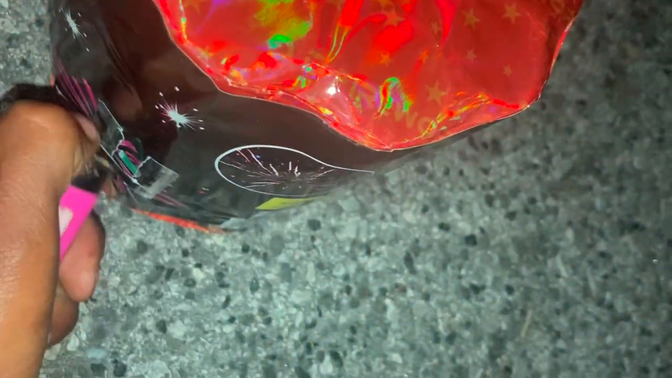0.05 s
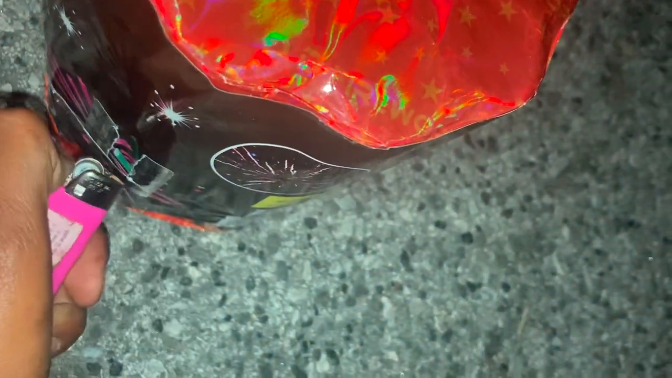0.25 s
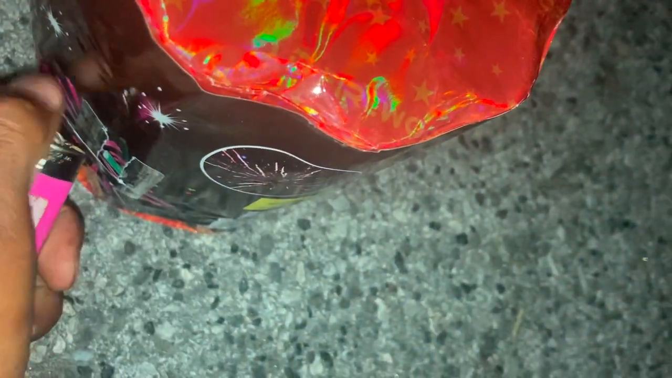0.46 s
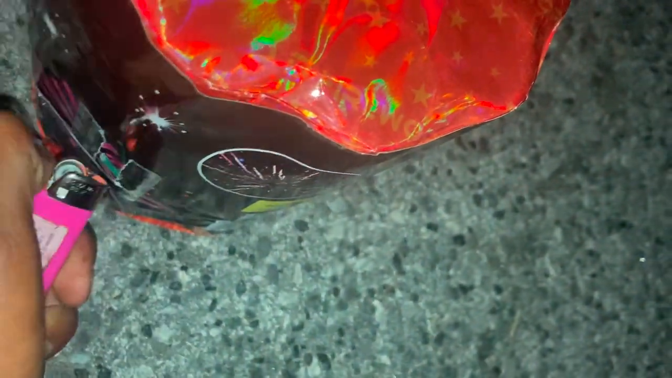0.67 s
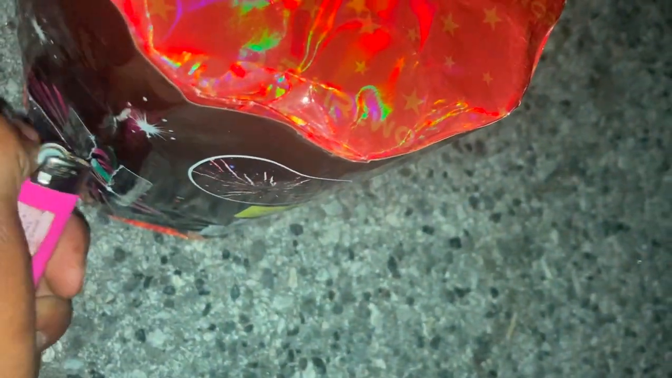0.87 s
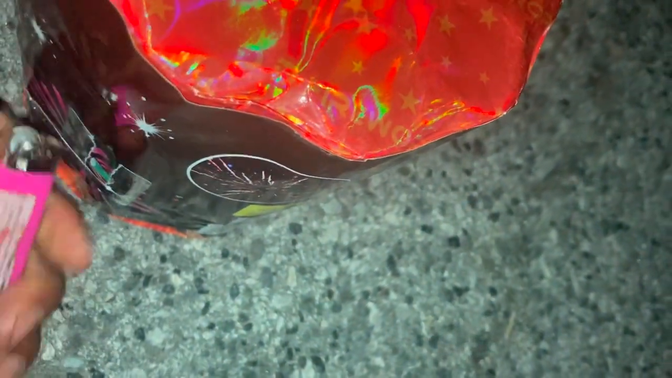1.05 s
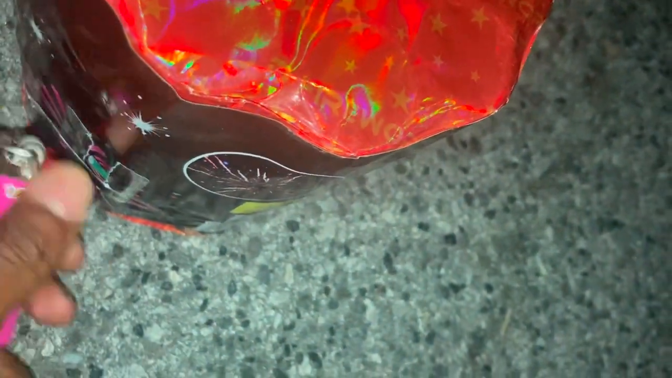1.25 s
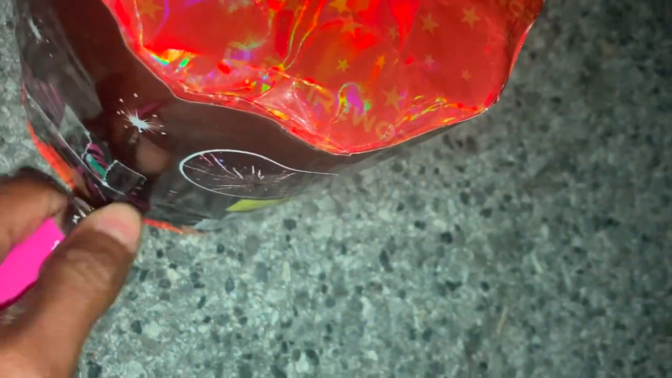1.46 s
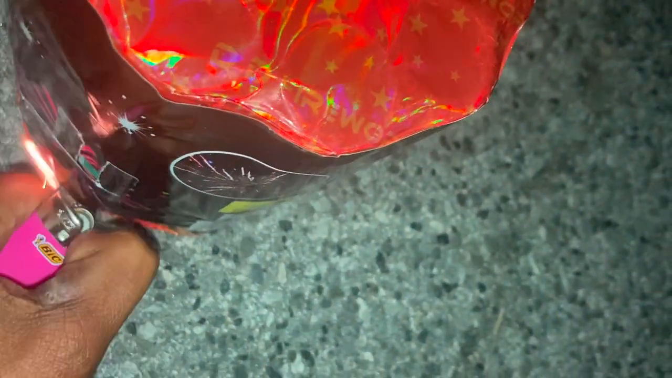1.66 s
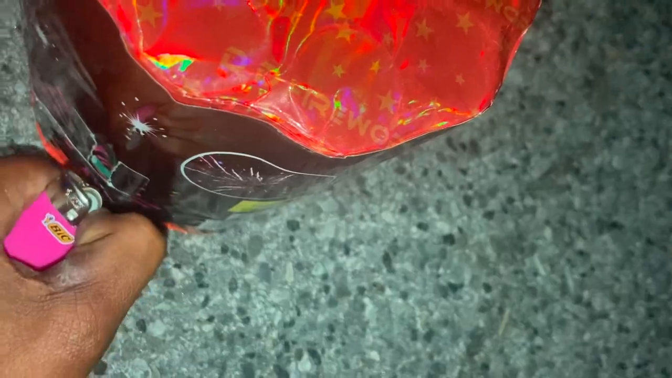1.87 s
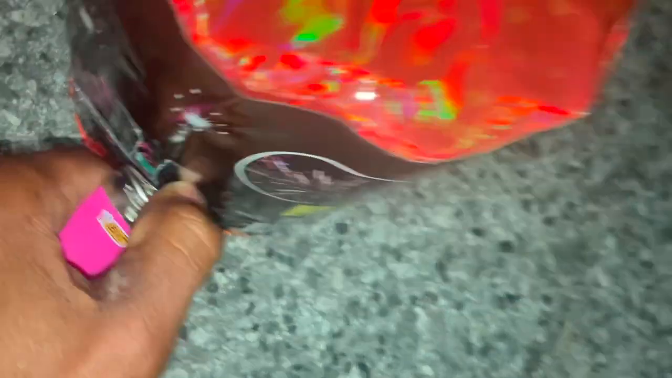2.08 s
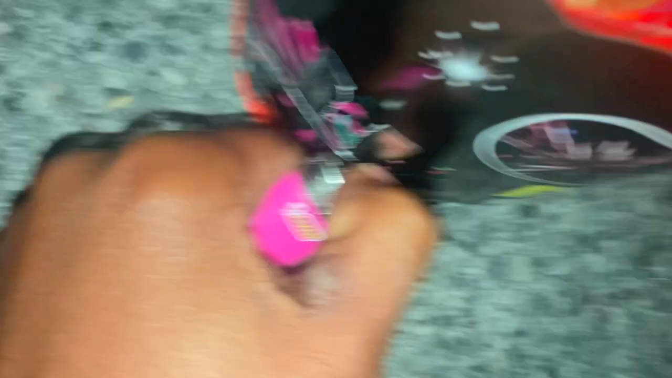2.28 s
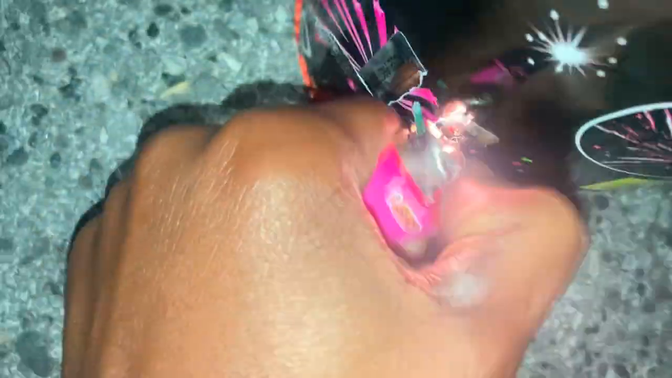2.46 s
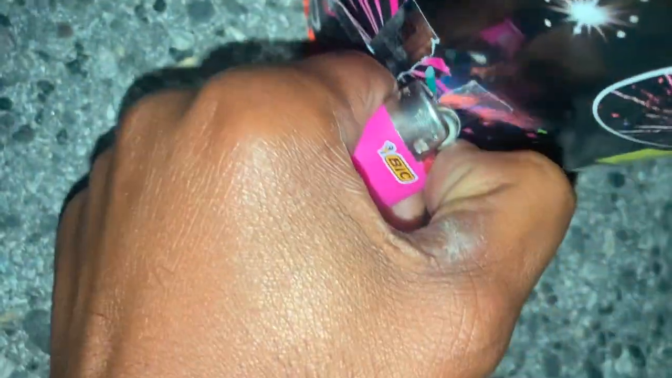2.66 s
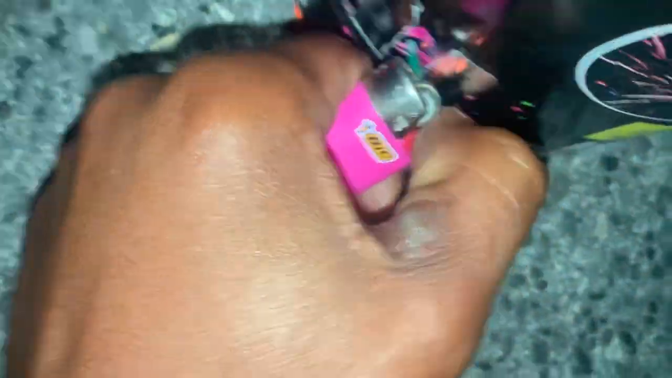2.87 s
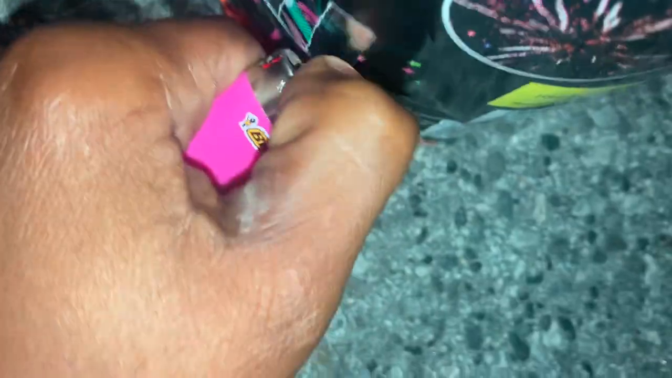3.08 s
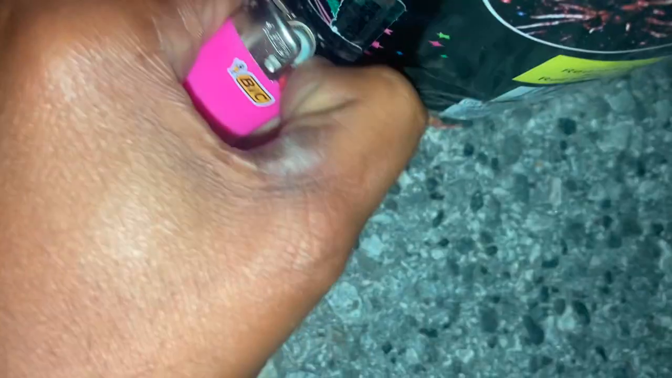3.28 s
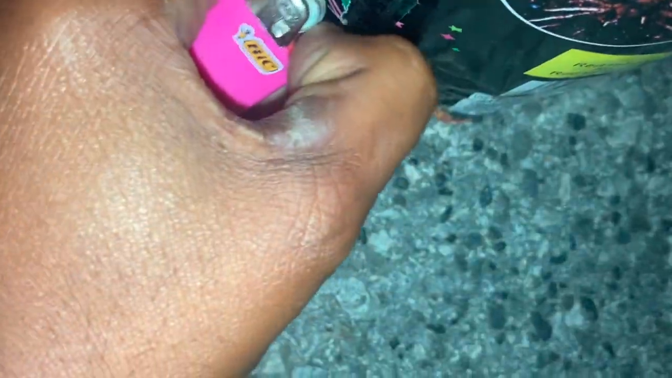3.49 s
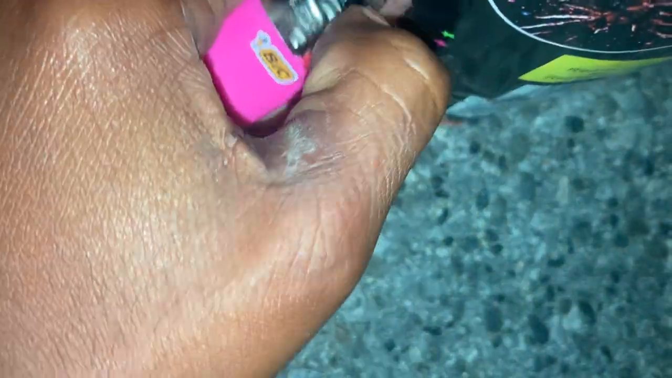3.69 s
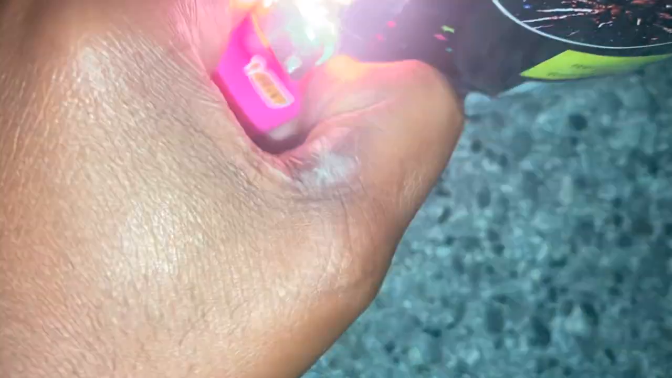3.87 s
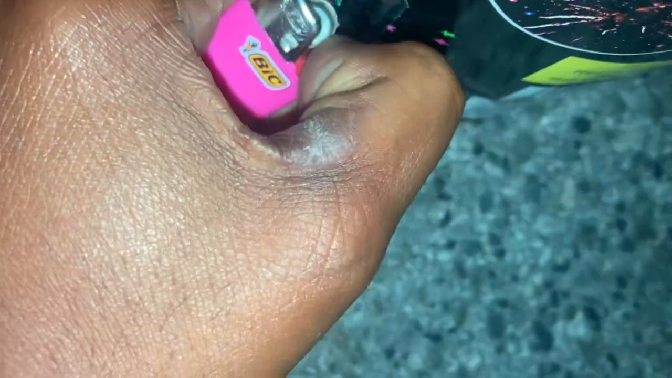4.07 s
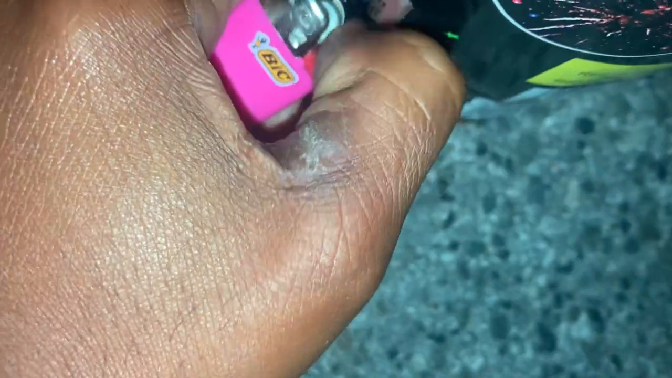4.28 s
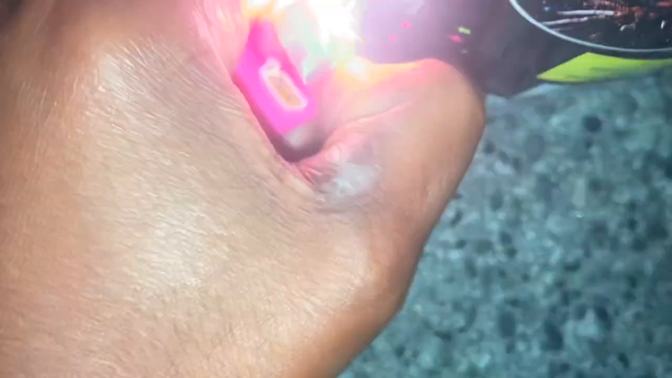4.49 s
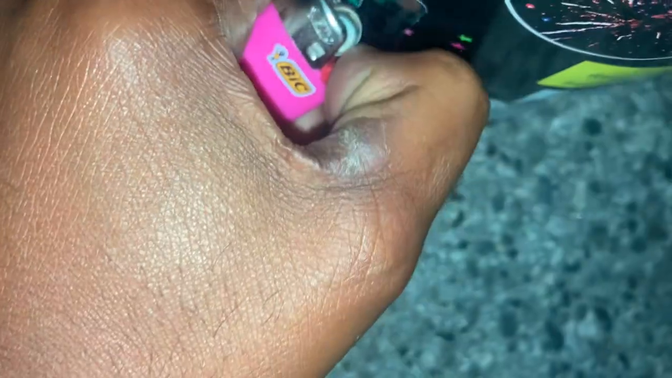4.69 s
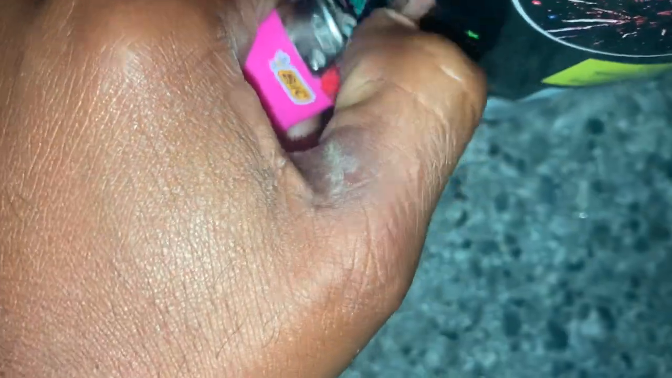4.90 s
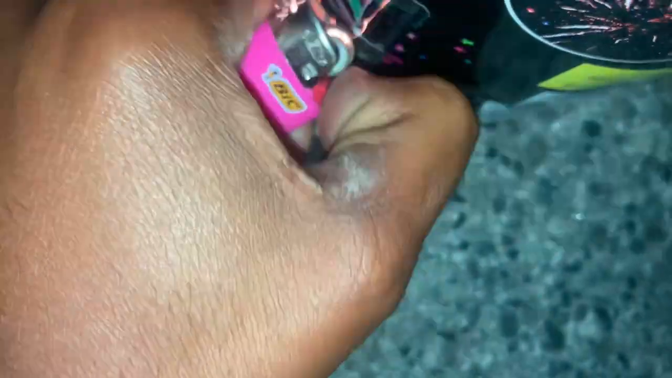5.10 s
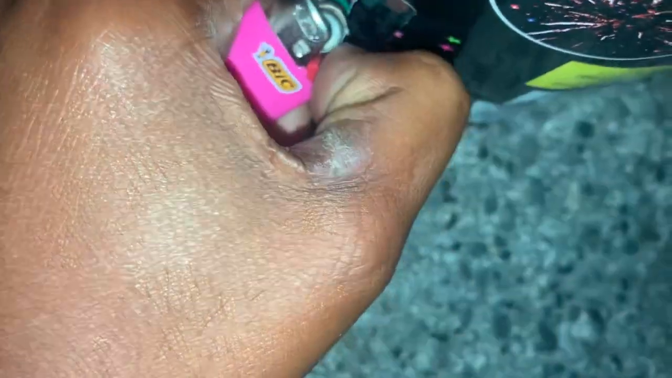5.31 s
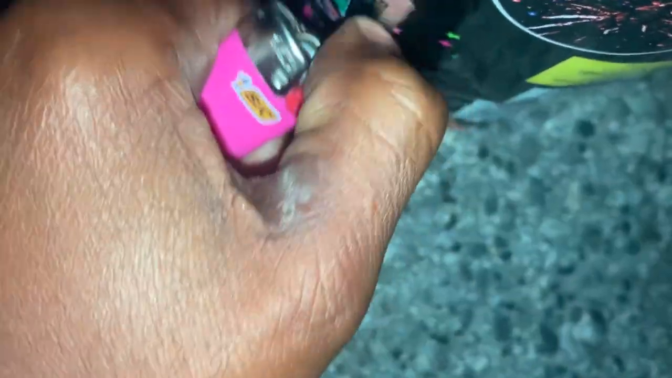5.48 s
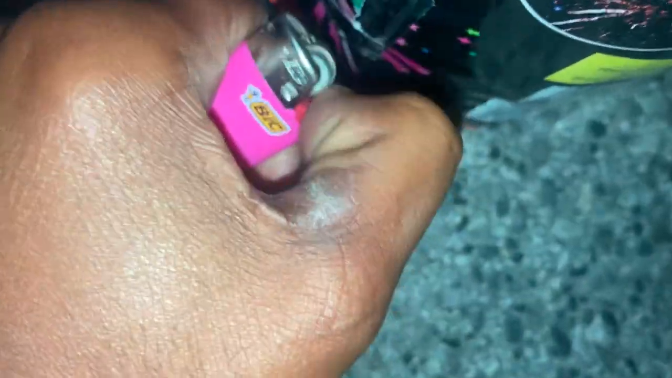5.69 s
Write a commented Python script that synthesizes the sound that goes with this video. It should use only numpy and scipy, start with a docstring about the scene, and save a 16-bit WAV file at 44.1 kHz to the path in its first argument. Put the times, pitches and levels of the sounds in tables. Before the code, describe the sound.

Close, crisp rasping clicks of a lighter wheel repeat outdoors, with tiny lever snaps between, above soft wind and a faint engine drone.

```python
"""A lighter is flicked nine times near a phone outdoors: noise cut by wheel teeth rings case and hood.
Small clicks, from ticks to lever snaps, are decaying noise bursts through steel and plastic colours.
Before the later flicks the thumb nudges the wheel and lets the gas lever snap up.
Wind is a low noise rumble; distant traffic is noise in a rush, a hiss and swelling bands, and an
engine is a wavering sine. The phone's limiter ducks everything briefly after loud bursts."""
import sys
import numpy as np
from scipy import signal
from scipy.fft import rfft, irfft, next_fast_len
from scipy.io import wavfile
from scipy.ndimage import uniform_filter1d, minimum_filter1d, map_coordinates

SR = 44100
rng = np.random.default_rng(int(sys.argv[2]) if len(sys.argv) > 2 else 0)


def transcribe(u):
    """Save the signal u as a 16-bit wav file named by the first command-line argument.

    u: samples, shape (n,) or (channels, n), limited to [-1, 1]; the rate is SR.
    q: integer samples, one column per channel.
    """
    v = np.clip(np.atleast_2d(u).T, -1, 1)
    q = np.round(v * 32767).astype(np.int16)
    wavfile.write(sys.argv[1], SR, q)


N = 253465

# left-right likeness of the distant traffic: (frequency [Hz], correlation [-1..1])
TRAFFIC_LIKENESS = [(250, .65), (600, 0.7), (1400, 0.52), (2200, 0.45), (5000, 0.12), (6500, 0.28),
                    (7500, 1), (15000, 1)]


def amp(db):
    """Amplitude factor from dB."""
    return 10 ** (np.asarray(db) / 20)


def unit(x):
    """Scale to rms 1."""
    return x / np.sqrt(np.mean(x ** 2) + 1e-20)


def along(points, hz):
    """Interpolate (Hz, value) points on a log frequency axis."""
    f, v = np.transpose(points)
    return np.interp(np.log(hz + 1), np.log(f + 1), v)


def curves(rows):
    """One value per sample for each column after the time."""
    s, *cols = np.transpose(rows)
    return [np.interp(np.arange(N) / SR, s, c) for c in cols]


def wobble(rate_hz, size=N):
    """Smooth random curve with rate_hz knots a second."""
    knots = rng.standard_normal(size // 8 + 8)
    return map_coordinates(knots, [np.arange(size) * rate_hz / SR], mode="mirror")


def filtered(x, response):
    """Apply a response given as a function of frequency."""
    n = x.shape[-1]
    m = next_fast_len(n + 4096)
    return irfft(rfft(x, m) * response(np.fft.rfftfreq(m, 1 / SR)), m)[..., :n]


def mid_side_gains(likeness):
    """Mid and side gains that give the wanted left-right correlation."""
    turn = np.arccos(np.clip(likeness, -1, 1)) / 2
    return np.array([np.cos(turn), np.sin(turn)])


def pair(colour_db, likeness, size=N):
    """Stereo noise of rms 1 with a given colour and left-right likeness."""
    noise = rng.standard_normal((2, size))
    mid, side = filtered(noise, lambda hz: amp(colour_db(hz)) * mid_side_gains(likeness(hz)))
    return unit(np.array([mid + side, mid - side]))


def add(track, s, sound):
    """Mix a stereo sound in at time s."""
    start = max(round(s * SR), 0)
    part = track[:, start:start + sound.shape[1]]
    part += sound[:, :part.shape[1]]


def at_ports(x, lead_rad, balance_db):
    """The two ports receive a sound out of step and at unequal levels (left against right)."""
    sides = np.array([[.5], [-.5]])

    def response(hz):
        phase = sides * np.interp(hz, *np.transpose(lead_rad))
        return np.exp(1j * phase) * amp(sides * along(balance_db, hz))

    return filtered(x, response)


def wind_and_traffic():
    """Low wind rumble, and distant traffic as a wide rush, a thin hiss and swelling noise bands."""
    # traffic: (time [s], rush level before trim [dB], hiss level before trim [dB])
    traffic_levels = [(0.0, -41, -50), (0.5, -43.5, -48.5), (0.8, -47, -49.5), (1.6, -44, -50),
                      (2.3, -44.5, -47.5), (2.48, -45, -51.5), (3.01, -47, -53), (3.4, -48, -56.5),
                      (3.65, -45, -57.5), (3.85, -48.5, -57.5), (4.3, -48.5, -58.5), (4.9, -48, -57),
                      (5.35, -50, -59.5), (5.75, -49.5, -57.5)]
    # spectrum of the rush: (frequency [Hz], relative density [dB])
    rush_colour = [(150, -5.5), (350, 2.5), (600, 3.5), (850, 2.5), (1100, 0), (1400, -5.5), (2000, -13.5),
                   (2600, -24.5), (4000, -40)]
    # spectrum of the hiss: (frequency [Hz], relative density [dB])
    hiss_colour = [(800, 9), (1500, 2.5), (2100, 1), (2600, 3), (3600, -1), (4400, -4), (5100, -5),
                   (5800, -10), (7600, -10), (9000, -15.5), (10500, -11), (12000, -17.5), (13500, -14.5),
                   (15500, -73)]
    # wind and traffic at the two ports: (frequency [Hz], phase by which left leads [rad])
    outdoor_lead = [(0, 0), (300, .3), (600, 2.2), (1200, 2.7), (2200, 6.2), (2700, 6.7), (3600, 9),
                    (5800, 15.3), (6900, 12.57), (9150, 9.42), (11300, 6.28), (13500, 3.14), (15700, 0)]
    balance_db = [(150, -1.9), (350, 0.5), (700, 2.5), (2500, 0.1), (7000, -0.7)]
    rush_trim_db, hiss_trim_db = 6.0, 7.5
    rush_db, hiss_db = curves(traffic_levels)
    likeness = lambda hz: along(TRAFFIC_LIKENESS, hz)
    rush = patchy(pair(lambda hz: along(rush_colour, hz), likeness), depth_db=2.5)
    rush = rush * amp(rush_db + rush_trim_db + 0.7 * wobble(25))
    hiss = patchy(pair(lambda hz: along(hiss_colour, hz), likeness), depth_db=2.5)
    hiss = hiss * amp(hiss_db + hiss_trim_db + 0.45 * wobble(14))
    return at_ports(buffeting() + rush + hiss + traffic_swells(), outdoor_lead, balance_db)


def buffeting(start_db=-30.5, easing_db_per_s=0.33, flutter_db=1.0):
    """The wind rumble flutters and eases slowly; each gust, or a puff of air from the moving hand, adds a low
    swell that passes."""
    # spectrum of the steady rumble: (frequency [Hz], relative density [dB])
    rumble_colour = [(20, -31.5), (32, -17.5), (42, -5), (52, 3.5), (70, 2.5), (100, 2.5), (125, -0.5),
                     (160, -2.5), (210, -3), (280, -9), (400, -18), (550, -18), (1000, -84.5)]
    # spectrum of a gust or puff on the microphone: (frequency [Hz], relative density [dB])
    gust_colour = [(22, -35), (34, -13), (50, 10.5), (120, 4.5), (200, -1), (350, -40.5), (700, -110)]
    # gusts, and at 0.63 s a puff of air from the moving hand: (centre time [s], level [dB], Gaussian sigma [s])
    gust_rows = [(0.422, -33, 0.017), (0.63, -24.5, 0.0087), (0.78, -32, 0.22), (2.462, -33, 0.032),
                 (2.706, -32.5, 0.017), (4.913, -29, 0.027), (5.027, -27.5, 0.024), (5.477, -27.5, 0.11)]
    t = np.arange(N) / SR
    likeness = lambda hz: along([(100, 0.94), (300, 0.83)], hz)
    steady = amp(start_db - easing_db_per_s * t + flutter_db * wobble(25))
    gusts = sum(amp(db) * np.exp(-((t - s) / sigma_s) ** 2 / 2) for s, db, sigma_s in gust_rows)
    rumble = steady * pair(lambda hz: along(rumble_colour, hz), likeness)
    return rumble + gusts * pair(lambda hz: along(gust_colour, hz), likeness)


def patchy(x, depth_db):
    """Narrow bands swell and fade on their own."""
    z = signal.stft(x, nperseg=2048)[2]
    field = rng.standard_normal(z.shape[1:])
    field = uniform_filter1d(field, size=5, axis=0)
    field = uniform_filter1d(field, size=6, axis=1)
    return unit(signal.istft(z * amp(depth_db * unit(field)), nperseg=2048)[1][:, :N])


def traffic_swells(flutter_db=1.5, waver_s=.0005):
    """Distant traffic adds noise bands, narrow whines to broad hiss, that swell and fade."""
    # (centre time [s], Gaussian sigma [s], centre [Hz], half width at -6 dB [Hz], level [dB],
    #  glide as a share of the pitch [1/s])
    swells = [(0.2, 0.66, 1360, 140, -44.5, 0), (0.4, 1.0, 11900, 547, -61, 0),
              (0.59, 0.031, 2040, 80, -46, 0.011), (1.149, 0.79, 2060, 100, -50, .05),
              (1.1, .25, 4530, 220, -56.5, 0), (1.602, .7, 5080, 280, -57, 0.021),
              (2.298, 0.32, 850, 120, -44, 0.0018), (2.5, .4, 7300, 940, -61, 0),
              (2.5, 0.48, 11230, 1400, -60, 0.00071), (4.594, 0.53, 375, 16, -47.5, 0.0023)]
    out, n = np.zeros((2, N)), np.arange(N)
    likeness = lambda hz: along(TRAFFIC_LIKENESS, hz)
    for s, sigma_s, centre_hz, width_hz, db, glide in swells:
        band = pair(lambda hz: -20 * np.log10(1 + ((hz - centre_hz) / width_hz) ** 2), likeness)
        since_s = n / SR - s
        # reading the band at a shifting time glides and wavers its pitch
        read_at = n + SR * (glide * since_s ** 2 / 2 + waver_s * wobble(9))
        swell = amp(db + flutter_db * wobble(11.5)) * np.exp(-(since_s / sigma_s) ** 2 / 2)
        out += np.array([np.interp(read_at, n, port) for port in band]) * swell
    return out


def engine(trim_db=-0.5):
    """The firing tone of a distant engine: a sine wavering in pitch and level on the wind."""
    # (time [s], mean firing rate [Hz], level before trim [dB])
    drone = [(0, 87, -38), (0.9, 88, -38), (1.3, 107, -41), (1.9, 109, -35), (2.4, 106, -37),
             (3.1, 104, -36), (3.5, 102, -44), (4.1, 103, -42), (5.75, 108, -54)]
    hz, db = curves(drone)
    phase = 2 * np.pi * np.cumsum(hz * (1 + 0.011 * wobble(8))) / SR
    port_db = np.array([[-.8], [.8]])
    return unit(np.sin(phase)) * amp(db + trim_db + 0.86 * wobble(6.3) + port_db)


def lighter():
    """Wheel strokes and clicks, out of step and unequal at the two ports."""
    # lighter at the two ports: (frequency [Hz], phase by which left leads [rad])
    lighter_lead = [(0, 0), (2000, 3.1), (4000, 6.3), (5800, 8.3), (6900, 6.3), (9150, 3.14), (11300, 0),
                    (13500, -3.14), (15700, -6.28)]
    return at_ports(flicks() + clicks(), lighter_lead, [(1500, 0.36), (4000, 2.1), (7000, 0.43)])


def flicks(rasp_ring=0.36, bite_taper=1.4, fall_s=0.0057, run_out_db=-8.5,
           drag_db=-24.5, drag_s=0.02, case_below_hz=2550):
    """The wheel creeps, speeds up over the flint, bites and runs out; case and hood colour the noise."""
    # (time [s], bite level [dB], bite time [s], run-up level [dB], run-up time constant [s],
    #  case lift [dB], hood rings as (frequency [Hz], lift [dB]))
    strokes = [(0.1386, -8, 0.0026, -19, 0.0045, 5, [(2400, 6), (3400, 8.5), (3800, 8.5), (9000, 11),
               (9400, 9.5), (10150, 14.5), (12050, 4), (12900, 6), (14650, 2)]),
               (0.6366, -8, 0.0022, -24, 0.012, 2.5, [(2550, 8), (3000, 8), (3450, 12.5), (3950, 8),
               (7300, 10), (9450, 14), (10350, 9.5), (13900, 9)]),
               (1.616, -9, .0028, -18.5, 0.0056, 2.5, [(2900, 7.5), (4100, 4), (5050, 10.5), (5800, 6.5),
               (7300, 9), (7750, 8.5), (8350, 9), (9000, 8), (10000, 1)]),
               (2.4907, -2, 0.0024, -16, 0.004, 6, [(2800, 5), (4350, 4), (4950, 1), (5900, 12), (7050, 5),
               (9050, 23.5), (10050, 7), (11850, 13)]),
               (3.2458, -3.5, 0.0025, -18, 0.0074, -1.5, [(3000, 3.5), (4100, 2.5), (4750, 13), (6050, 7),
               (8350, 13.5), (10650, 10), (11150, 6.5), (15400, 8)]),
               (3.8755, -7, 0.003, -13.5, 0.0043, 2.5, [(3000, 2), (5650, 12), (8050, 6), (9100, 6),
               (10900, 15), (13600, 8.5)]), (4.512, -5, 0.0025, -20.5, 0.0068, 0.5, [(3000, -0.5),
               (3900, 5), (5250, 6), (6150, 9), (7250, 8), (9050, 4), (10000, 7), (13450, 8.5)]),
               (5.0835, -3.5, 0.0024, -18.5, 0.0063, -2, [(3300, 2.5), (5350, 11), (6850, 11.5), (7450, 2),
               (8250, 9.5), (11350, 6.5), (13250, 9), (14600, 10)]),
               (5.6255, -5, 0.0028, -17, 0.0036, -3.5, [(4000, 6), (5450, 7.5), (7000, 4.5), (7900, 4),
               (8450, 6.5), (13400, 6)])]
    # spectrum of wheel on flint: (frequency [Hz], relative density [dB])
    rasp_colour = [(300, -2), (1100, -10.5), (2000, -2.5), (2800, -4.5), (4000, 2.5), (5200, 0.5),
                   (6400, 0.5), (7400, 6.5), (11000, 7.5), (14500, 6), (15800, 6)]
    out, t = np.zeros((2, N)), np.arange(-2048, 2048) / SR
    before = t < 0
    for s, bite_db, bite_s, up_db, rise_s, case_db, rings in strokes:
        # the plastic case carries the low part, the steel hood the rings
        grind = lambda hz: along(rasp_colour, hz) + case_db / (1 + (hz / case_below_hz) ** 4)
        spin = np.where(before, amp(up_db), amp(bite_db + run_out_db))
        spin = spin * np.exp(-np.abs(t / np.where(before, rise_s, fall_s)))
        drag = amp(up_db + drag_db) * before * np.exp(-(t / drag_s) ** 4)
        grit = teeth(t)
        rasp = excited((drag + spin) * grit, lambda hz: grind(hz) + rasp_ring * ringing(rings, hz))
        # the bite rings the hood in full
        press = amp(bite_db) * np.exp(-np.abs(t / bite_s) ** bite_taper)
        bite = excited(unit(press * grit), lambda hz: grind(hz) + ringing(rings, hz))
        bite = bite * np.sqrt(np.mean(press ** 2))
        add(out, s + t[0], rasp + bite)
    return out


def teeth(t, tooth_hz=1085, slow_share=.4, spin_s=.009, uneven_db=3.0, catch=0.68, jitter=0.25):
    """Each knurled tooth catches the flint and lets go, on average fastest at the bite."""
    speed = slow_share + (1 - slow_share) * np.exp(-np.square(t / spin_s))
    rate_hz = np.abs(tooth_hz * speed * (1 + jitter * wobble(500, size=len(t))))
    passed = np.cumsum(rate_hz) / SR
    sizes = amp(uneven_db * rng.standard_normal(len(t)))
    # catch: decay constant in tooth periods
    return unit(sizes[passed.astype(int)] * np.exp(-(passed % 1) / catch))


def ringing(rings, hz, width_hz=260):
    """Lift in dB from a set of resonances."""
    return sum(lift_db / (1 + ((hz - centre_hz) / width_hz) ** 2) for centre_hz, lift_db in rings)


def excited(force, colour_db):
    """A gritty contact force rings a minimum-phase body of the given colour, in stereo."""
    # left-right likeness of the lighter: (frequency [Hz], correlation [-1..1])
    lighter_likeness = [(500, 0.24), (1800, 0.73), (3500, 0.73), (6000, 0.41), (7500, 1), (15000, 0.96)]
    n = len(force)
    hz = np.fft.rfftfreq(n, 1 / SR)
    # folding the cepstrum to positive times puts the energy at the onset
    cepstrum = irfft(np.log(amp(colour_db(hz))), n)
    body = np.exp(rfft(2 * cepstrum * (np.arange(n) < n // 2)))
    gains = mid_side_gains(along(lighter_likeness, hz))
    mid, side = irfft(rfft(force * rng.standard_normal((2, n))) * body * gains, n)
    return unit(np.array([mid + side, mid - side])) * np.sqrt(np.mean(force ** 2))


def clicks(steel_t60_s=0.0042, case_t60_s=0.017, steel_db=-2, case_db=-2,
           tail_db=-27, tail_t60_s=0.07, contact_s=.0003):
    """Small steel parts snap home and knock the plastic case, which the hand damps at once."""
    # spectrum of the case's knock: (frequency [Hz], relative density [dB])
    plastic = [(250, 1.5), (450, 2.5), (700, -9), (950, -4.5), (1400, -10), (1950, 0.5), (2600, -10),
               (4000, -16.5), (8000, -21)]
    out, t = np.zeros((2, N)), np.arange(2048) / SR
    contact = 1 - np.exp(-t / contact_s)
    for s, db, knock_db, part in contacts():
        decay = amp(-60 * t / steel_t60_s) + amp(tail_db - 60 * t / tail_t60_s)
        snap = excited(contact * decay, part)
        knock = excited(contact * amp(-60 * t / case_t60_s), lambda hz: along(plastic, hz))
        add(out, s, amp(db) * (amp(steel_db) * snap + amp(case_db + knock_db) * knock))
    return out


def contacts(nudge_knock_db=-15, rebound_s=.0095, rebound_db=-12.5):
    """List contacts as (s, dB before trim, relative knock dB, steel colour); sprung parts rebound once."""
    # a tooth snags, or the thumb lands or shifts: (time [s], level before trim [dB],
    #  plastic knock against that level [dB])
    ticks = [(0.1488, -12.5, -16), (0.159, -25, -12), (0.4375, -21.5, -18), (0.645, -8.5, -27),
             (0.6662, -25, -11), (0.9079, -24, -16), (1.169, -31, -14), (1.6, -24, -14),
             (1.6205, -6.5, -22), (2.0418, -30, -14), (2.513, -22, -6), (2.597, -32, 3),
             (3.069, -51.5, 25.5), (3.2115, -27, -14), (3.2673, -19, -5), (3.291, -26.5, -21),
             (3.8358, -37, -14), (3.8708, -11, -23), (3.8784, -9, -18.5), (3.8855, -15.5, -6),
             (3.8964, -23, -8), (3.9106, -19.5, -17), (4.0825, -26.5, -15), (4.3432, -30, -14),
             (4.4868, -35, -14), (4.539, -27, -4), (4.5428, -33, -14), (4.554, -34, -14), (4.8966, -23, -5),
             (5.110, -20, -13), (5.118, -25, -19), (5.123, -21, -17), (5.128, -29, -13), (5.168, -32, -16),
             (5.6108, -22, -5)]
    # wheel nudge, then lever snap: (snap time [s], snap level before trim [dB],
    #  knock against the snap [dB], nudge lead [s], nudge level before trim [dB])
    regrips = [(3.6949, -16.5, -4.5, 0.045, -25.5), (4.3207, -12, -6.5, 0.045, -27),
               (4.883, -11, -10, .0543, -24.5), (5.484, -21, -4.5, 0.074, -21.5)]
    # spectrum of a click's metal part: (frequency [Hz], relative density [dB])
    steel_colour = [(1500, -24), (3000, -2), (4200, 4.5), (5800, 0), (7300, 4), (9000, 3), (11300, 5.5),
                    (13500, 2), (15800, -5.5)]
    # spectrum of the gas lever hitting its stop: (frequency [Hz], relative density [dB])
    lever_colour = [(500, -15), (1200, 15), (2000, -4), (2600, 3), (3300, -1.5), (4600, -4), (6100, -8),
                    (7000, 0), (9000, -4.5), (11000, -7), (14000, -22), (15800, -17)]
    # resonances of the lever: (frequency [Hz], lift [dB])
    lever_rings = [(5350, 3.7), (7100, 5.5), (9200, 7.5)]
    steel = lambda hz: along(steel_colour, hz)
    lever = lambda hz: along(lever_colour, hz) + ringing(lever_rings, hz)
    rows = [(*tick, steel) for tick in ticks]
    for snap_s, snap_db, knock_db, lead_s, nudge_db in regrips:
        nudge = (snap_s - lead_s, nudge_db, nudge_knock_db, steel)
        snap = (snap_s, snap_db, knock_db, lever)
        for s, db, *sound in (nudge, snap):
            rows += [(s, db, *sound), (s + rebound_s, db + rebound_db, *sound)]
    return rows


def scene():
    """Lighter, wind, distant traffic and engine together."""
    return lighter() + wind_and_traffic() + engine()


def limiter(x, ceiling_db=-10, ahead_s=0.0058, hold_s=0.1, release_db_per_s=85):
    """The gain falls just before a loud burst, holds, then creeps back."""
    t = np.arange(N) / SR
    power = np.abs(uniform_filter1d(np.mean(x ** 2, axis=0), size=110))
    level_db = 10 * np.log10(power + 1e-12)
    hold = int(hold_s * SR)
    cut_db = -minimum_filter1d(np.minimum(ceiling_db - level_db, 0), hold, origin=(hold - 1) // 2)
    cut_db = np.maximum.accumulate(cut_db + release_db_per_s * t) - release_db_per_s * t
    cut_db = uniform_filter1d(np.interp(t + ahead_s / 2, t, cut_db), int(ahead_s * SR))
    return x * amp(-cut_db)


def record(dry, round_at=.8, top_hz=15950):
    """The phone limits loud bursts, rounds off the highest peaks and cuts steeply above its band limit."""
    held = limiter(dry)
    rounded = held / (1 + np.abs(held / round_at) ** 5) ** (1 / 5)
    return filtered(rounded, lambda hz: 1 / (1 + (hz / top_hz) ** 160))


dry = scene()
out = record(dry)
transcribe(out)
```